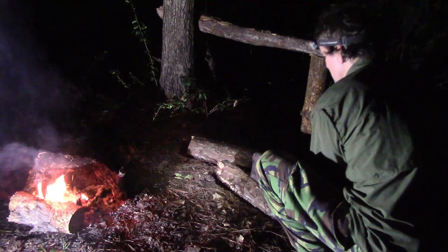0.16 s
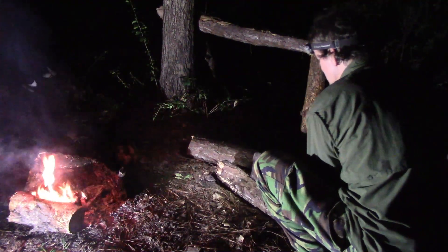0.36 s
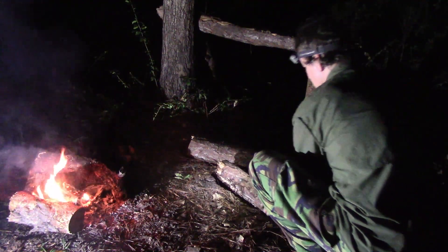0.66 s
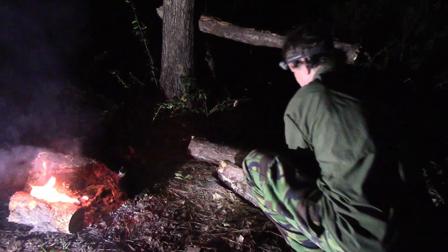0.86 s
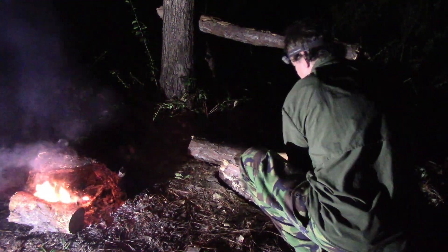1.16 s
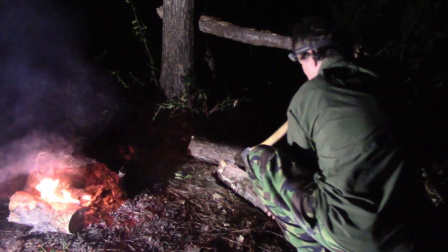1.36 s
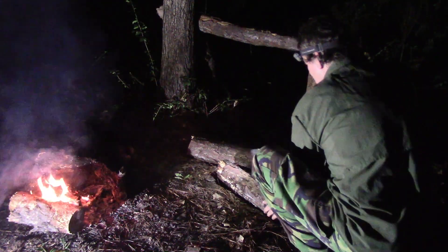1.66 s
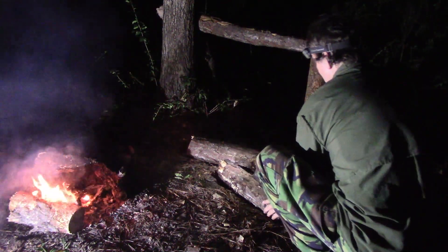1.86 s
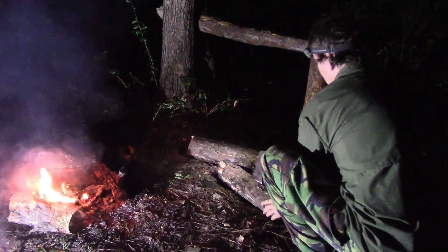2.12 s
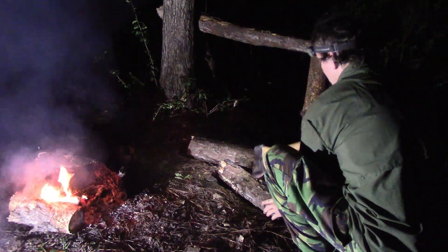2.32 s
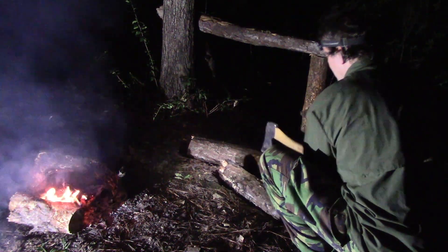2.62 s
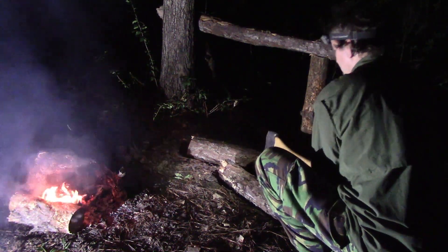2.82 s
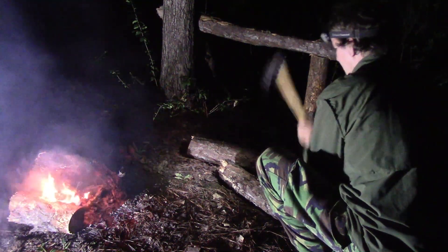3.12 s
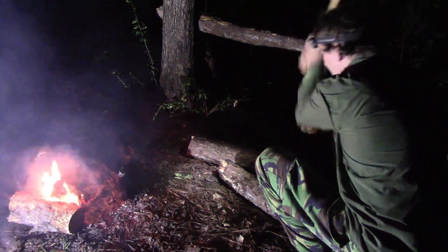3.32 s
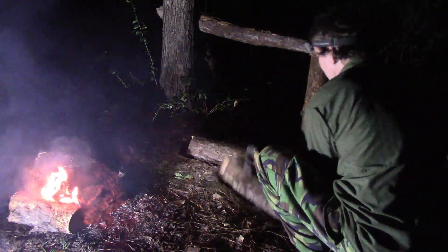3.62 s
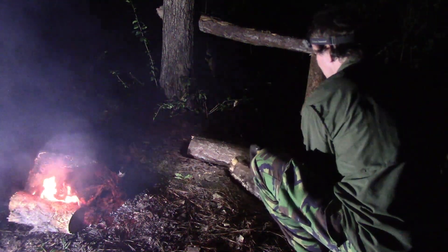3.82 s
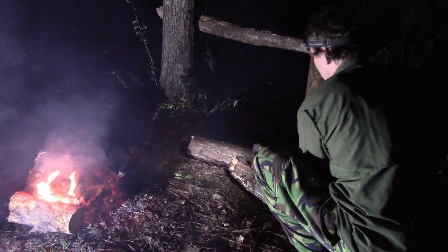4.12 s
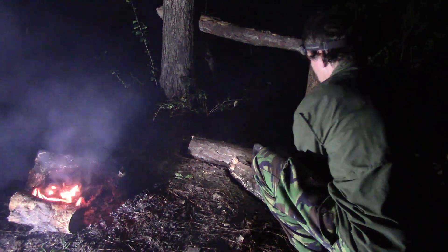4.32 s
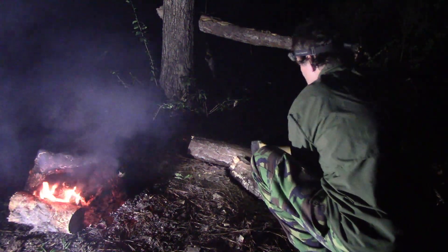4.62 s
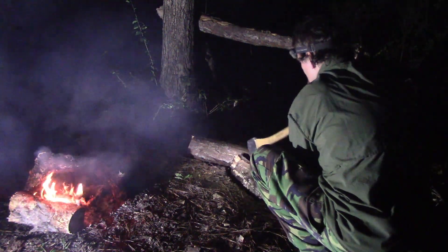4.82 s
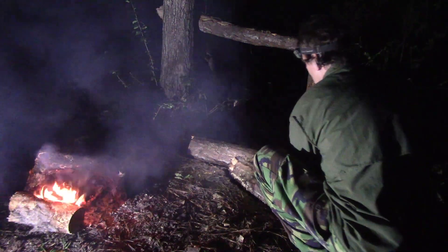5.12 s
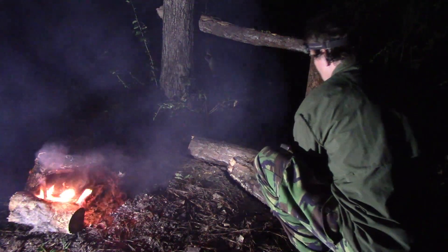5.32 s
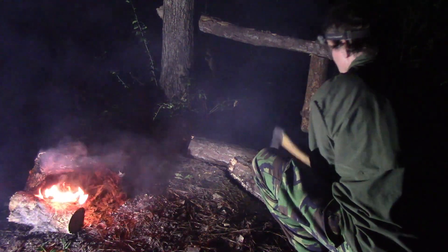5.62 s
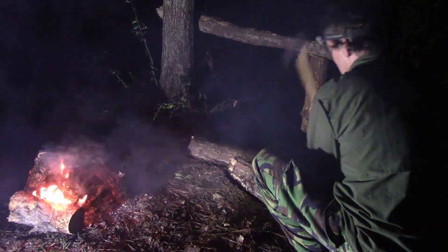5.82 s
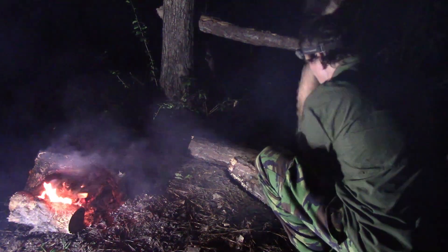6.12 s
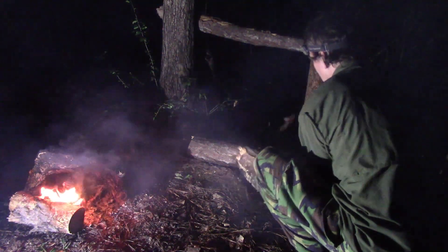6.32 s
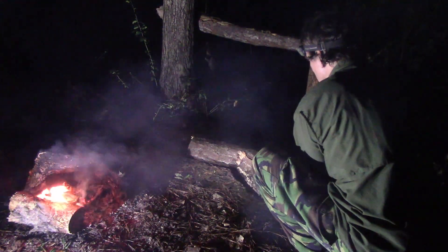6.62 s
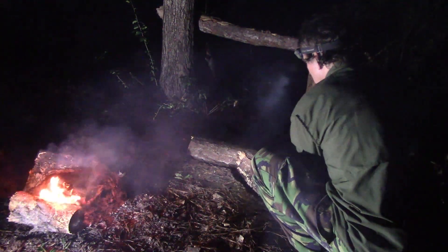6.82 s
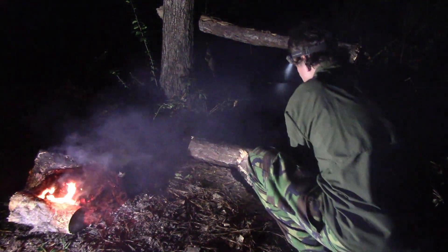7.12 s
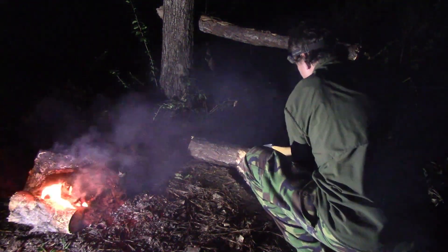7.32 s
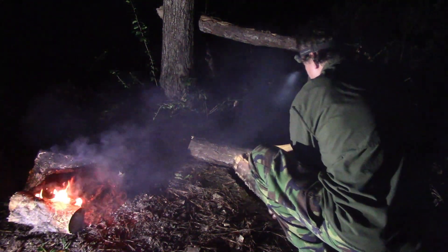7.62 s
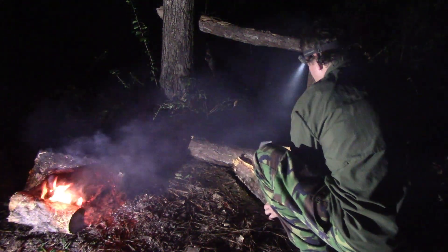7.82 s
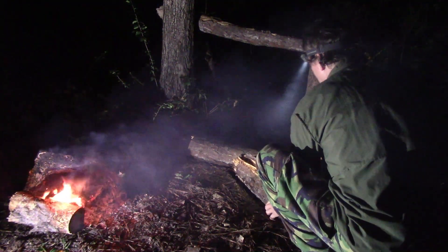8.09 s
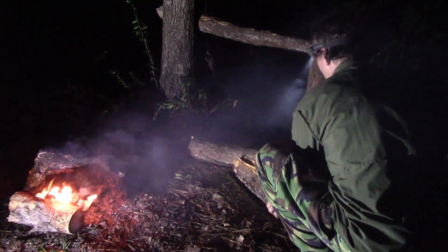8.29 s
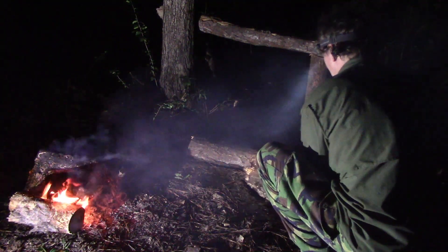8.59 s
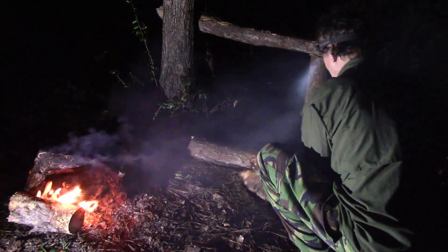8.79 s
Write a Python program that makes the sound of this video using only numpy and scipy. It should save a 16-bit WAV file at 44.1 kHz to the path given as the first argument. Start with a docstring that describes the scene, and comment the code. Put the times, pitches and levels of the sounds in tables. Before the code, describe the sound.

Two hard hatchet chops ring and echo in a dark cricket-filled wood beside a softly fluttering fire, followed by sharp splintering and shuffling.

```python
"""Night in a wood: crickets trill all around, a lone one chirps, and a small campfire flutters and snaps.
Someone kneeling there shifts in cloth and leaf litter, and wood cracks faintly. Then a hatchet strikes a log
twice; each blow bites, rings, thuds and echoes among the trees, and chips patter down. Last the split wood is
prised apart with scrapes and sharp cracks, and the body shifts again. Struck wood and soil are sums of decaying
sines; fire, tearing and rustle are shaped noise; insects are narrow noise bands and one pulsed tone."""
import sys
import numpy as np
from scipy import signal
from scipy.fft import rfft, irfft, next_fast_len
from scipy.io import wavfile

SR = 44100
rng = np.random.default_rng(int(sys.argv[2]) if len(sys.argv) > 2 else 0)


def master_out(mix):
    """Clip the mix to full scale and print it as 16-bit PCM to the path in sys.argv[1]."""
    frames = np.transpose(np.atleast_2d(mix))
    ceiling = np.clip(frames, -1, 1)
    pcm = np.round(ceiling * 32767).astype(np.int16)
    wavfile.write(sys.argv[1], SR, pcm)


N = 394688


def from_db(db):
    """Turn dB into an amplitude factor."""
    return 10 ** (np.asarray(db) / 20)


def rms_one(x):
    """Scale a sound to an rms of 1."""
    return x / np.sqrt(np.mean(x ** 2) + 1e-20)


def peak_one(x):
    """Scale a sound to a peak of 1."""
    return x / np.max(np.abs(x))


def seconds(length):
    """Time axis in seconds."""
    return np.arange(int(length * SR)) / SR


def dying(t, t60):
    """Exponential decay that falls by 60 dB in t60 seconds."""
    return np.exp(-np.log(1000) * t / t60)


def add(track, s, sound):
    """Mix a sound into a track at time s."""
    at = max(0, round(s * SR))
    track[at:at + len(sound)] += sound[:N - at]


def low_cut(x, hz):
    """Remove the bass below a corner frequency."""
    sos = signal.butter(2, hz, "high", fs=SR, output="sos")
    return signal.sosfilt(sos, x + 1e-18)


def coloured(x, spectrum):
    """Filter a sound by a smooth curve, interpolated in dB over log frequency."""
    hz, db = np.transpose(spectrum)
    padded = next_fast_len(len(x))
    bins = np.maximum(np.fft.rfftfreq(padded, 1 / SR), 1)
    gain = from_db(np.interp(np.log(bins), np.log(hz), db))
    return irfft(rfft(x, padded) * gain, padded)[:len(x)]


def noise(spectrum, size):
    """Noise with a given spectrum and an rms of 1."""
    return rms_one(coloured(rng.standard_normal(size), spectrum))


def drift(rate):
    """Random wandering with an rms of 1, through a new value rate times per second."""
    knots = rng.standard_normal(int(N / SR * rate) + 2)
    return rms_one(np.interp(np.arange(N) / SR * rate, np.arange(len(knots)), knots))


def spread(mid, side, width=0.21):
    """Diffuse sound on two closely spaced microphones: a shared middle and a weaker, opposed side."""
    return mid + width * side * np.array([[1], [-1]])


def ring(modes, t, scatter_db, detune):
    """Decaying modes, alternating in sign; each blow excites and tunes them a little differently."""
    hz, db, t60 = np.transpose(modes)[:, :, None]
    level_chance, pitch_chance = rng.standard_normal((2, len(hz), 1))
    sign = (-1) ** np.arange(len(hz))[:, None]
    waves = np.sin(2 * np.pi * hz * (1 + detune * pitch_chance) * t)
    levels = from_db(db + scatter_db * level_chance)
    return np.sum(sign * levels * dying(t, t60) * waves, axis=0)


# Cricket choruses, the nearest first.
# Each row: centre in Hz, width in Hz, mean level in dB, wing strokes per second.
CRICKET_CHORUSES = [(2671.5, 81, -54, 55), (2583, 134, -56, 41), (2312, 110, -66.5, 26),
                    (3180, 210, -68, 55), (5616, 640, -68, 54)]
# Ebb and flow of the nearest trill; only the departure from its median is heard.
# Each row: time in seconds, level in dB.
NEAR_TRILL = [(0.0, -58), (0.87, -54), (2.44, -58), (3.56, -53), (4.39, -56), (7.15, -55), (7.43, -53),
              (8.5, -56), (8.95, -54)]


def crickets(stroke_depth=0.19, swell_db=0.83, follow=0.99):
    """Many wings blur into narrow noise bands that throb at the stroke rate."""
    out = np.zeros((2, N))
    trill_db = np.interp(np.arange(N) / SR, *np.transpose(NEAR_TRILL))
    for hz, width_hz, db, strokes_per_s in CRICKET_CHORUSES:
        edges = [hz - width_hz / 2, hz + width_hz / 2]
        band = signal.butter(2, edges, "band", fs=SR, output="sos")
        wings = rms_one(spread(*signal.sosfilt(band, rng.standard_normal((2, N)))))
        stroke_rate = strokes_per_s * (1 + 0.076 * drift(5.6))
        stroke = np.sin(2 * np.pi * np.cumsum(stroke_rate) / SR)
        ebb_db = swell_db * drift(4)
        if hz == CRICKET_CHORUSES[0][0]:
            ebb_db += follow * (trill_db - np.median(trill_db))
        out += from_db(db + ebb_db) * (1 + stroke_depth * stroke) * wings
    return out


# The lone cricket slows down, then picks up again.
# Each row: time in seconds, gap from one chirp to the next in seconds.
CHIRP_GAPS = [(2.6, .45), (3.1, .54), (5.4, .64), (6.5, .48)]


def chirper(pitch_hz=6110, chirp_db=-67, scatter_db=1, waver_hz=11, strokes_per_s=32):
    """One cricket sings short chirps of a thin wavering tone, pulsed by its wing strokes."""
    first_s, length_s = .38, .2
    level = np.zeros(N)
    swell = signal.windows.tukey(int(length_s * SR), .6)
    s = first_s
    for chance in rng.standard_normal(size=30):
        if s < N / SR:
            add(level, s - length_s / 2, from_db(chirp_db + scatter_db * chance) * swell)
        s += np.interp(s, *np.transpose(CHIRP_GAPS))
    tone = np.sin(2 * np.pi * np.cumsum(pitch_hz + waver_hz * drift(130)) / SR)
    strokes = 1 + .65 * np.sin(2 * np.pi * strokes_per_s * np.arange(N) / SR + drift(17))
    return level * strokes * tone


# Colour of the echoes from the trees.
# Each row: frequency in Hz, relative level in dB per Hz.
TREE_COLOUR = [(50, -4), (110, 5), (400, 5), (950, 6), (1600, 3.5), (4000, 8), (8000, 9), (16000, 1)]


def forest(x, echo_db=-12.0, trunks_s=0.024, rise_s=0.0035, litter_db=-6, near_t60=0.27,
           far_db=-14, far_t60=1.0, grain_db=1.1):
    """Litter scatters at once, near trunks answer after a short gap, deeper wood adds a tail without bass."""
    t = seconds(1)
    arrived = .5 + .5 * np.tanh((t - trunks_s) / rise_s)
    onset = arrived + from_db(litter_db) * (1 - arrived)
    grain = from_db(grain_db * drift(700)[:len(t)])   # single trunks stand out
    channels = []
    for _ in range(2):
        near = noise(TREE_COLOUR, size=len(t)) * dying(np.maximum(t - trunks_s, 0), near_t60) * onset
        deep = low_cut(noise(TREE_COLOUR, size=len(t)), hz=450)
        far = from_db(far_db) * deep * dying(t, far_t60) * arrived
        channels.append((near + far) * grain)
    echoes = spread(*channels) / np.linalg.norm(channels[0])
    return from_db(echo_db) * signal.fftconvolve(x[None], echoes, axes=1)[:, :N]


# Colour of the flames and night air.
# Each row: frequency in Hz, relative level in dB per Hz.
FLAME_COLOUR = [(25, -34), (60, -14), (120, -9.5), (250, -2.5), (430, 0), (700, -2), (1000, -7),
                (1800, -14), (3500, -17), (5000, -25), (8000, -30), (16000, -41)]


def flames(air_db=-53, flutter_db=.7):
    """A soft, slightly fluttering roar of shaped noise."""
    roar = spread(noise(FLAME_COLOUR, size=N), noise(FLAME_COLOUR, size=N))
    return from_db(air_db + flutter_db * drift(8.9)) * roar


def snap(hz, t60, dull_hz=10500):
    """A tiny burst: a few milliseconds of noise round one pitch, with its top dulled."""
    t = seconds(0.051)
    colour = [(hz / 12, -18), (hz / 2, -4), (hz, 0), (hz * 2, -8)]
    burst = noise(colour, size=len(t)) * dying(t, t60)
    return peak_one(signal.sosfilt(signal.butter(N=3, Wn=dull_hz, fs=SR, output="sos"), burst))


# The loudest snaps of embers and twigs.
# Each row: start in seconds, relative peak in dB, pitch in Hz.
EMBER_SNAPS = [(0.4403, -26.5, 4550), (0.644, -39, 5900), (0.835, -38, 5280), (1.1139, -35.5, 5900),
               (1.3796, -37, 3730), (1.9086, -44, 5710), (2.306, -42, 5910), (4.188, -42, 5350),
               (5.6865, -35, 8830), (6.5624, -42.5, 6750), (7.4642, -23, 7250), (7.7465, -41, 8300),
               (7.8712, -32, 3870), (8.3624, -35, 3500)]


def crackle(snap_db=2, tick_db=-55.5, ticks_per_s=12, scatter_db=3):
    """Loud snaps among many faint ticks from the embers, at random times and pitches."""
    out = np.zeros(N)
    for s, db, hz in EMBER_SNAPS:
        add(out, s, from_db(db + snap_db) * snap(hz, t60=0.0082))
    for when, size, pitch in rng.random((int(ticks_per_s * N / SR), 3)):
        level_db = tick_db - scatter_db * np.log(size + 0.064)   # few loud, many faint
        add(out, when * N / SR, from_db(level_db) * snap(3500 * 2 ** (1.3 * pitch), t60=0.012))
    return out


def gesture(s, db, rise_s, fade_s):
    """Gain of one movement: it swells by 20 dB over the rise and sinks by 20 dB over the fade."""
    t = np.arange(N) / SR - s
    return from_db(db - 20 * np.maximum(-t / rise_s, t / fade_s))


# Knees and boots on soft ground. Each row: start in seconds, peak in dB.
KNEE_THUMPS = [(0.069, -50), (4.331, -48), (4.478, -51), (8.259, -34), (8.326, -43), (8.364, -38),
               (8.935, -40)]
# Modes of the soft soil under them. Each row: frequency in Hz, relative level in dB, t60 in seconds.
SOIL_MODES = [(88, -7, 0.18), (120, -7, 0.2), (184, -2, 0.12), (248, 5.5, 0.056)]
# Movements of the body that brush cloth and litter.
# Each row: strongest moment in seconds, relative level in dB, 20 dB rise in seconds, 20 dB fade in seconds.
BODY_MOVES = [(0.01, -48.5, .05, .25), (0.66, -62, .06, .45), (2.6, -64, .35, .5), (5.48, -62.5, .3, .15),
              (7.33, -53, .23, .5), (8.255, -50.5, .035, .55), (8.95, -53, .1, .3)]
# Colour of the brushed cloth and litter. Each row: frequency in Hz, relative level in dB per Hz.
LITTER_COLOUR = [(200, -24), (800, 5), (2000, 4), (4000, -3), (7000, -2.5), (10000, -7.5), (13000, -18),
                 (16000, -23)]


def shuffling(rustle_db=1, grain_db=3, leaf_ticks_db=-5, resting_db=-73):
    """The body thumps on soil, brushes cloth and ticks dry leaves, which chips stir after each blow."""
    out, t = np.zeros(N), seconds(.3)
    for s, db in KNEE_THUMPS:
        thump = ring(SOIL_MODES, t, scatter_db=2, detune=.05) * (1 - np.exp(-t / .005))
        add(out, s, from_db(db) * peak_one(low_cut(thump, hz=60)))
    # chips are strongest 0.17 s after the blow
    chips = [(s + .17, -52, .16, .2) for s, *_ in HATCHET_BLOWS]
    power = sum(gesture(*move) ** 2 for move in BODY_MOVES + chips)
    level = np.sqrt(from_db(resting_db) ** 2 + power)
    cloth = rms_one(noise(LITTER_COLOUR, size=N) * from_db(grain_db * drift(500)))
    ticks = (rng.random(N) < 400 / SR) * rng.standard_normal(N)   # about 400 per second
    leaves = rms_one(coloured(ticks, SPLINTER_COLOUR))
    return out + from_db(rustle_db) * level * low_cut(cloth + from_db(leaf_ticks_db) * leaves, hz=122.6)


# Wood dragged over wood. Each row: middle in seconds, length in seconds, level in dB at the middle.
WOOD_DRAGS = [(.04, .12, -50), (1.15, 0.14, -65), (7.31, 0.22, -44.5), (7.406, 0.052, -46),
              (7.605, 0.45, -57), (8.764, 0.071, -44), (8.836, 0.16, -48.5)]
# Modes of the split piece, also rung by the cracks.
# Each row: frequency in Hz, relative level in dB, t60 in seconds.
SPLIT_PIECE_MODES = [(437, -10, 0.021), (683, -8, 0.029), (860, 5, 0.0081), (1037, 2, 0.02),
                     (1430, -2, 0.026), (1667, -5.5, 0.018), (2500, 6, 0.0075), (3550, 0, 0.0073)]


def scraping(slips_per_s=450, slip_scatter_db=5):
    """Dense little slips tick on the split piece and crumble its bark while it is dragged."""
    level = np.zeros(N)
    for s, length, db in WOOD_DRAGS:
        add(level, s - length / 2, from_db(db) * np.hanning(int(length * SR)))
    happens = rng.random(N) < slips_per_s / SR
    slips = happens * rng.choice([-1, 1], N) * from_db(slip_scatter_db * rng.standard_normal(N))
    piece = ring(SPLIT_PIECE_MODES, seconds(.05), scatter_db=1, detune=.02)
    body = signal.fftconvolve(slips, piece)[:N]
    debris = coloured(slips, BITE_COLOUR)
    return level * (rms_one(low_cut(body, hz=400)) + rms_one(debris))


def small_cracks(count=10, wood_db=11, splinter_db=4, scatter_db=3):
    """Lesser cracks at random within the drags, stronger in the harder ones; rows as in WOOD_CRACKS."""
    rows = []
    ends = np.cumsum([length for _, length, _ in WOOD_DRAGS])
    for pick, when, size in rng.random((count, 3)):
        s, length, db = WOOD_DRAGS[np.searchsorted(ends, pick * ends[-1])]   # longer drags crack more often
        db += scatter_db * (2 * size - 1)
        rows.append((s + length * (when - .5) / 2, db + wood_db, db + splinter_db))
    return rows


# The split wood cracking and knocking.
# Each row: start in seconds, peak of the wood's ring in dB, relative splinter level in dB.
WOOD_CRACKS = [(1.191, -33, -63), (1.302, -34, -69), (3.807, -33.5, -64), (4.985, -33.5, -46),
               (6.363, -29, -55), (7.19, -37, -47), (7.204, -45, -48), (7.238, -29, -43), (7.258, -28, -36),
               (7.286, -14, -28), (7.324, -18, -24.5), (7.376, -14, -48), (7.519, -31, -50),
               (7.581, -23, -41), (7.626, -41, -44), (7.672, -31, -47), (8.77, -18, -34), (8.809, -19, -42)]
# Fibres give way in steps, a weaker one before and after the main crack.
# Each row: delay in seconds, level in dB against the main crack.
CRACK_STEPS = [(-.005, -13), (0, 0), (.0055, -9.5)]
# Colour of splinters and leaf ticks. Each row: frequency in Hz, relative level in dB per Hz.
SPLINTER_COLOUR = [(800, -16), (3200, 7.5), (5000, -5), (7500, -1.5), (10000, -8.5), (13000, -42),
                   (16000, -42)]


def splitting(splinter_db=9, splinter_t60=0.0082, fibre_db=-8, fibre_t60=0.056, give_s=0.00045):
    """Each crack is a spit of splinters and a short ring of the piece, with fibres creaking after it."""
    out, t = np.zeros(N), seconds(0.26)
    stepped = [(s + delay, peak + db, sharp + db)
               for s, peak, sharp in WOOD_CRACKS for delay, db in CRACK_STEPS]
    for s, peak_db, sharp_db in stepped + small_cracks():
        give = 1 - np.exp(-t / give_s)
        wood = peak_one(ring(SPLIT_PIECE_MODES, t, scatter_db=1.0, detune=0.079) * give)
        fibres = peak_one(noise(BITE_COLOUR, size=len(t)) * dying(t, fibre_t60))
        splinters = noise(SPLINTER_COLOUR, size=len(t)) * dying(t, splinter_t60)
        piece = from_db(peak_db) * (wood + from_db(fibre_db) * fibres)
        add(out, s, piece + from_db(sharp_db + splinter_db) * splinters)
    return low_cut(out, hz=224)


# The hatchet blows.
# Each row: start in seconds, log ring in dB, pitch favoured by the struck spot in Hz, bite of the blade in dB,
# bite tilt in dB per octave, ground thud in dB, thud delay in seconds. Levels are relative.
HATCHET_BLOWS = [(3.6047, -7, 417, 0, 0.5, -15, 0.0011), (6.2255, -6.5, 730, -2, 0.5, -15.5, .006)]
# Modes of the log. Each row: frequency in Hz, relative level in dB, t60 in seconds.
LOG_MODES = [(402, -10.5, 0.049), (500, -11, 0.061), (685, -3.5, 0.046), (790, -9, 0.046), (888, -2, 0.043),
             (1160, -4.5, .04), (1480, -12, .018), (2110, -7, .016), (2570, -9, 0.038)]
# Modes of the log bouncing on the soil. Each row: frequency in Hz, relative level in dB, t60 in seconds.
GROUND_MODES = [(90.5, -15.5, .2), (130, -5, 0.1), (231, 5, 0.045), (272, 0.5, 0.043)]
# Colour of tearing fibres, also of crumbling bark. Each row: frequency in Hz, relative level in dB per Hz.
BITE_COLOUR = [(100, -28), (400, -9), (1000, 2), (1700, -5.5), (2600, -4), (3600, -6.5), (4800, -12.5),
               (6500, -13), (9000, -19.5), (12000, -28.5), (16000, -39)]


def hatchet(favour_db=12, contact_s=0.00031, soil_s=0.0016, bite_t60=.023, entry_s=0.00081,
            log_out_db=-3.5, thud_out_db=-1):
    """The blade tears in, the log rings, then pushes on the soil; returns near sound and sound to the trees."""
    near, outgoing, t = np.zeros(N), np.zeros(N), seconds(.4)
    for s, ring_db, favoured_hz, bite_db, tilt_db, thud_db, thud_delay_s in HATCHET_BLOWS:
        # modes near the favoured pitch gain, distant ones lose
        modes = [(hz, db + favour_db * (np.exp(-3 * np.log2(hz / favoured_hz) ** 2) - .5), t60)
                 for hz, db, t60 in LOG_MODES]
        log = ring(modes, t, scatter_db=1.5, detune=.004) * (1 - np.exp(-t / contact_s))
        log *= from_db(ring_db)
        thud = ring(GROUND_MODES, t, scatter_db=5.0, detune=0.014) * (1 - np.exp(-t / soil_s))
        thud *= from_db(thud_db)
        # the tilt bends only the range above 1500 Hz
        colour = [(hz, db + tilt_db * np.log2(max(hz, 1500))) for hz, db in BITE_COLOUR]
        bite = noise(colour, size=len(t)) * dying(t, bite_t60) * (1 - np.exp(-t / entry_s))
        bite *= from_db(bite_db)
        # averaged over all directions, the ragged bite is one smooth crack of the same energy
        crack = np.std(bite) * rms_one(coloured(signal.unit_impulse(len(t), 100), colour))
        add(near, s, log + bite)
        add(near, s + thud_delay_s, thud)
        add(outgoing, s, from_db(log_out_db) * log + from_db(thud_out_db) * thud + crack)
    return low_cut(near, hz=45), low_cut(outgoing, hz=45)


def scene():
    """Work on the log and the fire are close; the insects are all around."""
    chops, chops_outgoing = hatchet()
    prising = splitting() + scraping()
    fire = crackle()
    echoes = forest(chops_outgoing + from_db(-6) * prising + from_db(-7) * fire)
    background = flames() + crickets() + chirper()
    return chops + prising + fire + echoes + shuffling() + background


def record(dry, stop_hz=16500):
    """The blows overload the microphone, which rounds their peaks; the top from stop_hz is cut by 70 dB."""
    clipped = dry / (1 + dry ** 6) ** (1 / 6)
    return signal.sosfilt(signal.cheby2(14, 70, stop_hz, fs=SR, output="sos"), clipped)


dry = scene()
out = record(dry)
master_out(out)
```